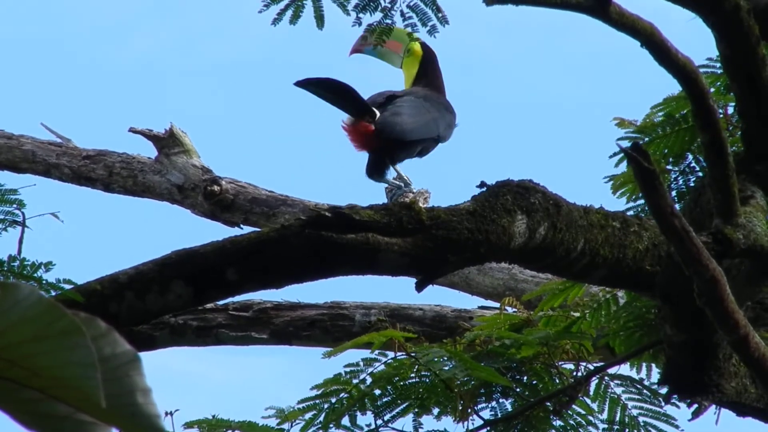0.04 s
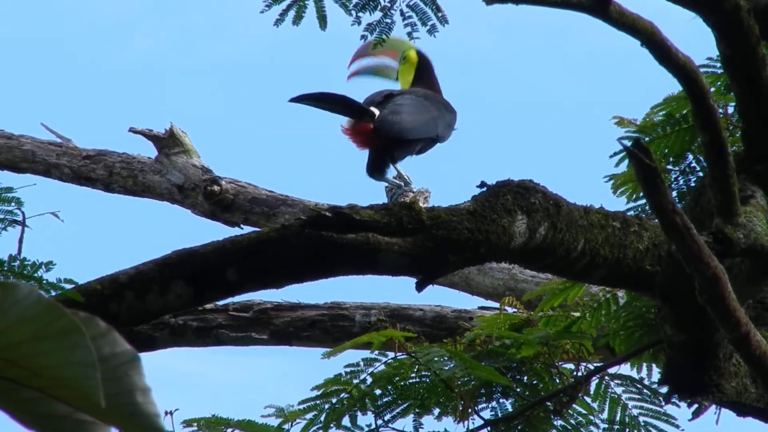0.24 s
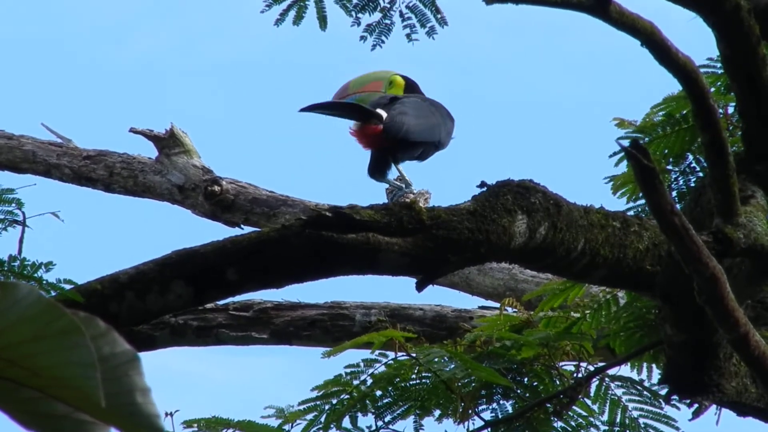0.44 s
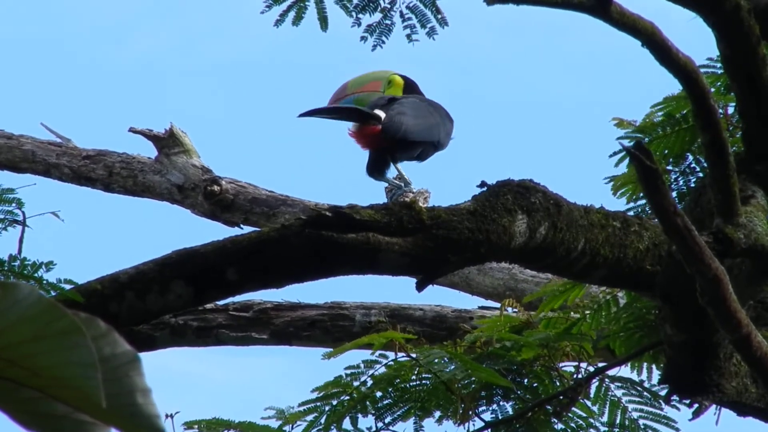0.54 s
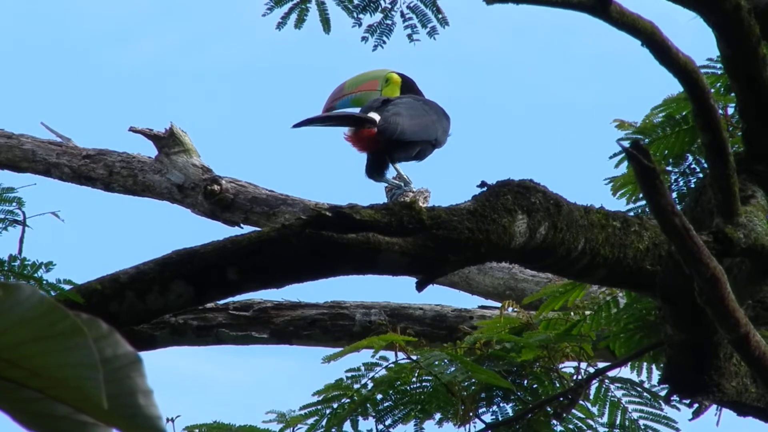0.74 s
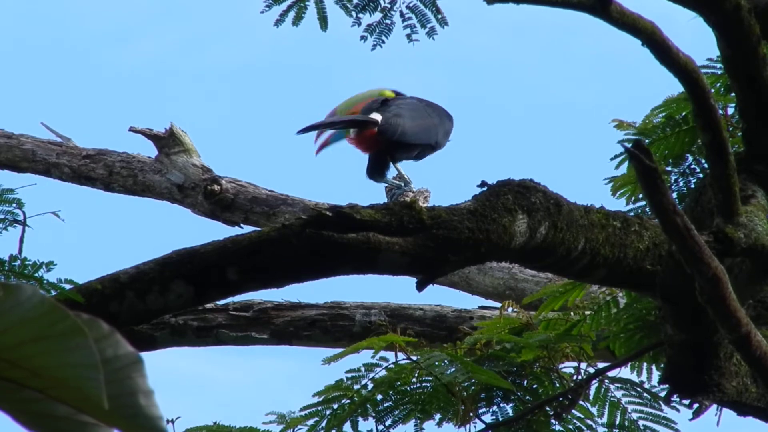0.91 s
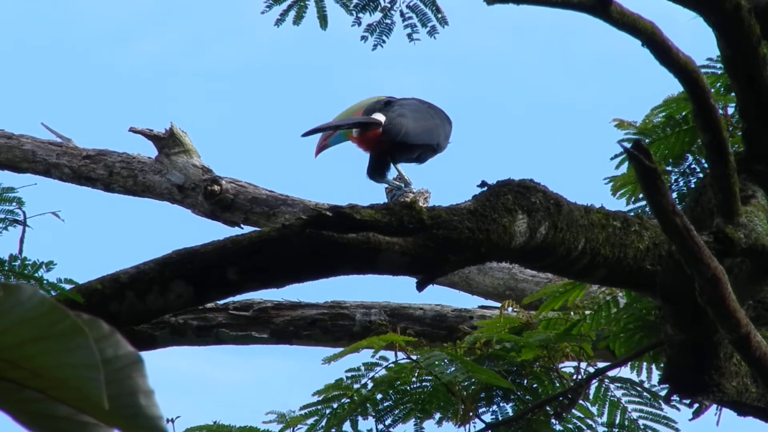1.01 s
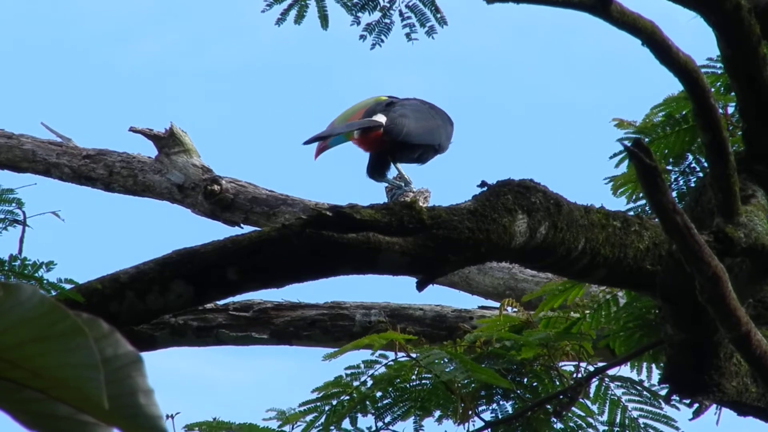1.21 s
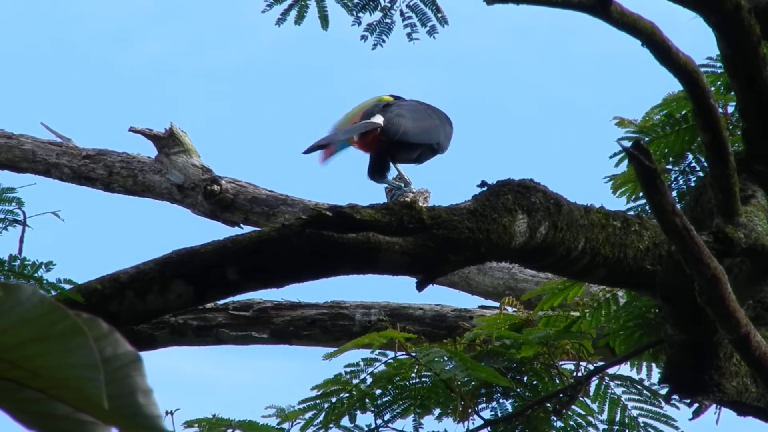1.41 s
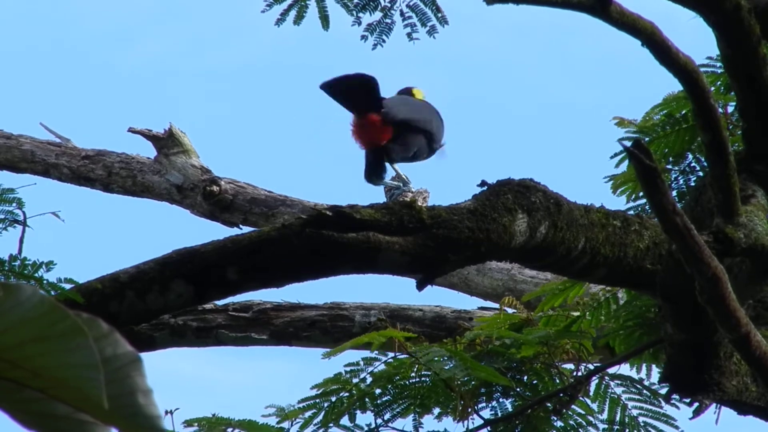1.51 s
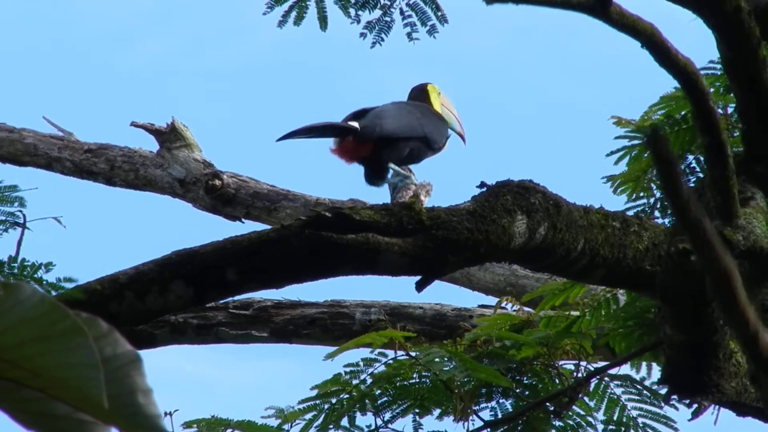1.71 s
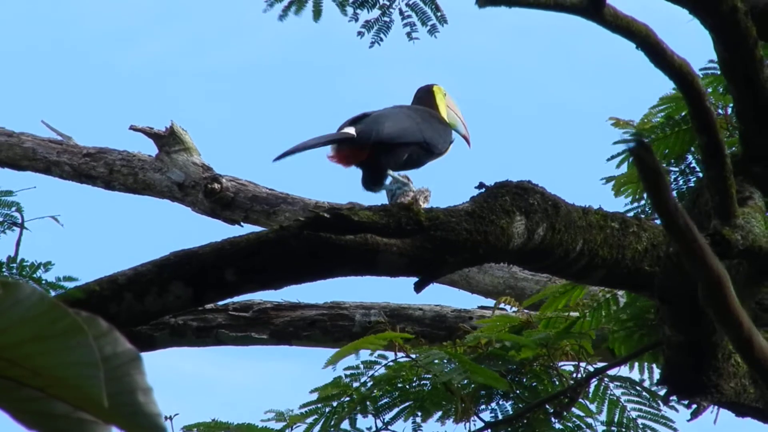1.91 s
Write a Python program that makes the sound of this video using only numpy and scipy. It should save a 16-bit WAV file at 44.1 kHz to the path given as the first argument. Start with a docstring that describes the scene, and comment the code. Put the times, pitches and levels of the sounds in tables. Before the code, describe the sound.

Outdoors in a forest, a toucan's clear yelps alternate with throbbing trills, slightly left of centre and with woodland echo, while rapid thin chipping builds at the left over faint whistles, insect hiss and a low wash.

```python
"""Toucan in a forest

A toucan gives three falling yelps and three softer, rising, throbbing trills, all gliding harmonic tones.
Discrete echoes return the yelps; random taps scatter all the calls.
A small bird's thin, mostly falling chips grow louder, among faint gliding whistles and the dying tail
of an earlier call. Shaped noise makes insect hiss, a low wash and a low rumble that swells now and then."""
import sys
import numpy as np
from scipy import signal
from scipy.fft import rfft, irfft
from scipy.io import wavfile
from scipy.ndimage import uniform_filter1d

SR = 44100
rng = np.random.default_rng(int(sys.argv[2]) if len(sys.argv) > 2 else 0)


def log_audio(samples):
    """Write samples as a 16-bit WAV file to the path given in sys.argv[1]."""
    # one column per channel
    frames = np.atleast_2d(samples).T
    # limit to full scale, then quantise
    limited = np.clip(frames, -1, 1)
    pcm = np.round(limited * 32767).astype(np.int16)
    wavfile.write(sys.argv[1], SR, pcm)


N = 85995  # length [samples]

# background spectrum: (frequency [Hz], relative density [dB])
AIR_SPECTRUM = [(15, -71), (25, -65), (64, 0.5), (126, -4), (179, -5.5), (222, -7), (333, -9.5), (414, -7),
                (513, -4), (691, -6.5), (749, -6.5), (1090, -9), (1640, -4), (2150, -8.5), (2460, -13),
                (2730, -9), (3220, -8.5), (9720, -13.5), (15800, -29.5)]
# left-right likeness of the background: (frequency [Hz], correlation [-1 to 1])
AIR_LIKENESS = [(60, 0.52), (150, 0.24), (400, -0.14), (1400, 0.28), (3000, 0.24), (5000, 0.36),
                (8000, -0.23), (15000, -0.31)]
# left-right balance of the background: (frequency [Hz], left minus right [dB])
AIR_BALANCE = [(60, 2.1), (120, 0.66), (240, -0.13), (480, -0.5), (950, -0.29), (1890, 1.9), (3770, 1.9),
               (7520, -1.3), (15000, -2.4)]
# low wash, then insect bands: (centre [Hz], half width [Hz], boost [dB])
AIR_BANDS = [(398, 64, 10), (3880, 86, 3), (5900, 160, 5), (9890, 660, 7)]
# low rumble swells: (centre [s], half length [s], centre [Hz], half width [octaves], boost [dB])
RUMBLE_SWELLS = [(0.324, 0.073, 107, 1, 11.5), (0.439, 0.048, 89, 0.93, 11.5),
                 (1.01, 0.076, 124, 0.49, 10.5), (1.61, 0.075, 92.59, 1, 7.5),
                 (1.27, 0.062, 453, 0.87, 1.5), (1.57, 0.46, 504, 1.0, 5.5)]
AIR_DB, PATCH_DB, FLICKER_DB = -52.5, 2, .5

# diffuse forest tail: (frequency [Hz], decay by 60 dB [s], level [dB])
FOREST_TAIL = [(477, 0.52, -6), (1540, 0.9, -16), (3050, 0.62, -11.5), (4720, 0.53, -14),
               (8100, 0.46, -2.5)]
FOREST_LIKENESS = 0.82  # left-right correlation of the taps
# scatter from nearby branches
NEAR_FIRST_S, NEAR_DECAY_S, NEAR_DB = .004, .022, -14

# faint whistles, and the dying tail of an earlier call:
# (start [s], length [s], start pitch [Hz], end pitch [Hz], level before sends [dB])
WHISTLES = [(-.08, 0.18, 2685, 2755, -50), (-.08, .22, 1703, 1639, -56), (0.264, 0.095, 2400, 2160, -54.5),
            (1.25, 0.099, 1760, 1875, -58.5), (1.427, 0.079, 1980, 1875, -55),
            (1.537, 0.079, 1920, 2084, -51), (1.61, 0.098, 3100, 3210, -58.5),
            (1.765, .08, 3228, 3365, -57), (1.841, .08, 3380, 3415, -56)]
# small bird: (start [s], start pitch [Hz], end pitch [Hz], level before sends [dB])
CHIPS = [ (0.560, 8200, 7320, -67), (0.617, 7000, 6050, -58.5), (0.723, 8200, 7180, -61),
         (0.778, 7100, 6140, -53), (0.878, 8250, 7170, -58.5), (0.932, 7200, 6120, -48),
         (1.001, 5750, 5050, -54), (1.031, 8300, 7200, -55.5), (1.078, 7500, 5930, -49),
         (1.106, 7400, 6300, -51), (1.153, 5900, 5300, -52.5), (1.181, 8300, 7130, -53.5),
         (1.227, 7600, 6250, -48.5), (1.253, 7400, 6280, -53), (1.299, 6300, 5230, -54.5),
         (1.332, 8400, 7200, -54.5), (1.378, 7500, 5700, -49), (1.405, 7400, 6200, -48),
         (1.45, 6600, 5280, -51.5), (1.483, 8400, 7220, -53.5), (1.534, 7800, 6270, -52),
         (1.558, 7600, 6360, -49.5), (1.605, 6500, 5350, -50.5), (1.638, 8300, 7370, -51.5),
         (1.683, 8100, 7050, -52.5), (1.707, 7900, 6100, -48.5), (1.759, 6600, 5380, -52),
         (1.788, 7700, 8030, -52.5), (1.847, 8200, 7100, -53.5), (1.866, 7900, 6480, -49),
         (1.912, 6550, 5490, -47), ]
# chip kinds, interpolated between: (start pitch [Hz], length [s], direct gain [dB])
CHIP_KINDS = [(6600, .022, -4), (7370, 0.01237, -12.5), (8250, 0.0157, -0.5)]
CHIP_ROUGH, WHISTLE_ROUGH = 0.16, .35
CHIP_FOREST_DB, CHIP_NEAR_DB = 9, 8
WHISTLE_DIRECT_DB, WHISTLE_FOREST_DB = -5, 8
CHIP_PAN_DB, SCATTER_PAN_DB = 12, 7.5

# one list per yelp: (time [s], pitch [Hz], fundamental [dB], octave [dB], upper overtones [dB],
# roughness [0 to 1])
YELPS = [
    [(0.218, 1656, -33.5, -33, -52, .01), (0.233, 1707, -31.5, -29, -60, 0),
     (0.249, 1682, -25, -26.5, -48, 0), (0.267, 1579, -24.5, -28, -50, 0),
     (0.300, 1518, -37, -43, -53, .15), (0.325, 1488, -30, -33.5, -50, 0.12),
     (0.346, 1429, -27.5, -35.5, -56, 0), (0.355, 1367, -41, -42.5, -57, 0.1),
     (0.369, 1226, -46, -43, -53, 0.37)],
    [(0.508, 1449, -34, -29.5, -71, 0.01), (0.517, 1496, -39.5, -39, -47, 0),
     (0.524, 1500, -34.5, -30.5, -65, 0.04), (0.531, 1461, -31.5, -29, -50, 0),
     (0.536, 1383, -47, -37, -45.5, 0.4), (0.547, 1310, -36.5, -34.5, -52, 0.25)],
    [(0.820, 1512, -35, -39, -44, .05), (0.831, 1539, -44, -34.5, -56, 0.09),
     (0.841, 1508, -44.5, -33.5, -54, 0.07), (0.848, 1464, -31.5, -34, -47, 0),
     (0.852, 1360, -45, -36, -44, 0.47), (0.860, 1340, -45, -35, -54, 0.5)],
]
# upper overtones: (multiple of the pitch, level against the upper overtones column [dB])
YELP_OVERTONES = [(3, -2), (4, -13), (5, -24)]
# one list per trill: (time [s], pitch [Hz], level [dB], throb depth, double-speed throb depth)
TRILLS = [
    [(0.372, 1332, -38, 0.64, 0.3), (0.405, 1407, -42, 0.46, .7), (0.430, 1527, -32.5, 0.036, 0.64),
     (0.465, 1512, -33, .03, 0.63), (0.482, 1610, -35, 0.035, .3)],
    [(0.902, 1311, -45, 1, .03), (0.932, 1333, -39, 0.85, .03), (0.975, 1390, -39.5, 1.15, 0.027),
     (1.015, 1492, -34.5, 0.98, 0.16), (1.036, 1535, -32.5, .05, 0.3), (1.068, 1559, -31.5, .03, 0.65),
     (1.082, 1588, -39, .03, .2)],
    [(1.506, 1323, -49, 0.8, .03), (1.532, 1337, -39, 1.44, .03), (1.574, 1445, -38.5, 0.5, 0.028),
     (1.594, 1510, -33.5, 0.89, 0.068), (1.618, 1567, -32, 0.94, 0.12), (1.634, 1576, -31, 0.12, 0.037),
     (1.680, 1588, -32, 0.18, 0.036), (1.699, 1636, -38, .03, 0.028)],
]
# one row per trill: (time of one throb [s], rate [throbs/s], octave [dB], third harmonic [dB]),
# both harmonics against the fundamental
TRILL_THROBS = [(0.441, 50, -38, -17), (0.973, 47.75, -24, -50), (1.573, 48.8, -24.5, -40)]
# discrete echoes off trunks and crowns: (delay [s], left [dB], right [dB])
ECHOES = [(0.028, -14.5, -14.5), (0.044, -14.5, -24), (0.058, -36, -21), (0.081, -18.5, -39)]
ATTACK_S, RELEASE_S = 0.0081, 0.0073
RASP_HZ, JITTER = 352, 0.093  # roughness bandwidth; relative pitch jitter per unit roughness
THROB_BEND, TRILL_WAVER = .015, .016  # pitch swing within a throb: per unit depth, and constant
THROB_ROUGH, TRILL_ROUGH = .15, .05  # roughness: per unit depth, and constant
# second trill tone: share, twice the throb depth at which it enters, offset in throb rates
SPLIT_SHARE, SPLIT_FROM, SPLIT_MULTIPLE = .6, 1.4, 4
TOUCAN_PAN_DB, TRILL_PAN_DB, LEFT_LAG_S = 2.0, 3.2, .00002
TRILL_NEAR_DB, TRILL_FAR_DB = -3, -2  # trill sends against the yelps
FOREST_DELAY_S = .036

BASS_CUT_HZ, EDGE_HZ = 65, 15800


def amp(db):
    """Decibels to gain."""
    return 10 ** (np.asarray(db) / 20)


def evened(x):
    """Scales to an rms of one."""
    return x / np.sqrt(np.mean(x ** 2) + 1e-20)


def read(points, hz):
    """Interpolates a table on a log-frequency axis."""
    f, value = np.transpose(points)
    return np.interp(np.log(hz + 1), np.log(f + 1), value)


def follow(curve):
    """Sample times of a call, then each of its controls at those times."""
    s, *columns = np.transpose(curve)
    t = np.arange(s[0], s[-1], 1 / SR)
    return [t] + [np.interp(t, s, c) for c in columns]


def wander(size, hz):
    """Low-passed noise of unit rms."""
    low_pass = signal.butter(6, hz, fs=SR, output="sos")
    settled = signal.sosfilt(low_pass, rng.standard_normal(N))[-size:]
    return evened(settled)


def track(events):
    """Sums (start, sound) pairs on one time line; a sound may already be under way at time zero."""
    out = np.zeros(N)
    for start_s, sound in events:
        at = round(start_s * SR)
        sound = sound[max(-at, 0):]
        part = out[max(at, 0):][:len(sound)]
        part += sound[:len(part)]
    return out


def pan(x, db):
    """Leans a sound to the left by a level difference."""
    return x * amp([[db / 2], [-db / 2]])


def delayed(x, delay_s):
    """Fractional delay as a phase slope."""
    hz = np.fft.rfftfreq(2 * N, 1 / SR)
    return irfft(rfft(x, 2 * N) * np.exp(-2j * np.pi * hz * delay_s))[..., :N]


def background():
    """Wide insect hiss, low wash and rumble swells: noise shaped in frequency, time and stereo width."""
    frames, hz = N // 256 + 5, np.fft.rfftfreq(1024, 1 / SR)
    t = np.arange(frames)[:, None] * 256 / SR
    a, b, c, d, patches = rng.standard_normal((5, frames, len(hz)))
    patches = uniform_filter1d(patches, size=12, axis=0)
    patches = evened(uniform_filter1d(patches, size=10, axis=1))

    db = read(AIR_SPECTRUM, hz)
    db = db + sum(g * np.exp(-((hz - f) / w) ** 2) for f, w, g in AIR_BANDS)
    db = db + PATCH_DB * patches + FLICKER_DB * rng.standard_normal((frames, 1))
    swell_db = 0
    for s, half_s, f, octaves, g in RUMBLE_SWELLS:
        distance = ((t - s) / half_s) ** 2 + (np.log2((hz + 1) / f) / octaves) ** 2
        swell_db = swell_db + g * np.exp(-distance)

    same = np.clip(read(AIR_LIKENESS, hz), -1, 1)
    lean = amp(read(AIR_BALANCE, hz) / 2)
    left, other = a + 1j * b, c + 1j * d
    right = same * left + np.sqrt(1 - same ** 2) * other
    z = np.array([left * lean, right / lean]) * amp(db)

    def sound(spectrum):
        return signal.istft(spectrum, nperseg=1024, noverlap=768, time_axis=1, freq_axis=2)[1][:, :N]

    # level reference: the mono sum without swells
    return amp(AIR_DB) * sound(z * amp(swell_db)) / sound(z).mean(0).std()


def forest(x):
    """Scatter from leaves and branches: sparse random taps that die at a different rate in each band."""
    a, b = rng.standard_normal((2, SR)) * (rng.random(SR) < .1)
    taps = np.array([a, FOREST_LIKENESS * a + np.sqrt(1 - FOREST_LIKENESS ** 2) * b])
    hz, t, z = signal.stft(taps, SR, nperseg=256)
    table = np.array(FOREST_TAIL)
    t60_s, level_db = read(table[:, :2], hz), read(table[:, ::2], hz)
    z = z * amp(-60 * t / t60_s[:, None])
    energy = (abs(z) ** 2).sum(2).mean(0)
    z /= np.sqrt(uniform_filter1d(energy, size=3))[:, None]
    flat = signal.istft(z, SR, nperseg=256)[1]
    tail = signal.istft(z * amp(level_db)[:, None], SR, nperseg=256)[1]
    tail = tail / np.linalg.norm(flat[0])
    return signal.fftconvolve(x[None], tail, axes=1)[:, :N]


def branches(x):
    """Weak early reflections from branches around a bird: decaying random taps, partly shared by the sides."""
    t = np.arange(0, NEAR_FIRST_S + 4 * NEAR_DECAY_S, 1 / SR)
    taps = rng.standard_normal((3, len(t))) * (t > NEAR_FIRST_S) * np.exp(-t / NEAR_DECAY_S)
    taps = taps[:2] + taps[2]
    taps = taps / np.linalg.norm(taps[0])
    return amp(NEAR_DB) * signal.fftconvolve(x[None], taps, axes=1)[:, :N]


def glide(start_s, length_s, from_hz, to_hz, db, rough):
    """One note: a roughened sine whose pitch glides fastest at first."""
    u = np.arange(0, length_s, 1 / SR) / length_s
    hz = from_hz + (to_hz - from_hz) * np.sin(np.pi / 2 * u ** 1.083)
    phase = 2 * np.pi * np.cumsum(hz) / SR
    envelope = np.sqrt(2 * np.sin(np.pi * u)) * (1 + rough * wander(len(u), RASP_HZ))
    return start_s, amp(db) * envelope * np.sin(phase)


def chips_and_whistles():
    """Chips, faint whistles and the tail of an earlier call, direct and scattered by the trees."""
    kinds = np.array(CHIP_KINDS)
    chips, direct = [], []
    for s, from_hz, to_hz, db in CHIPS:
        length_s, direct_db = read(kinds[:, :2], from_hz), read(kinds[:, ::2], from_hz)
        start_s, sound = glide(s, length_s, from_hz, to_hz, db, CHIP_ROUGH)
        chips.append((start_s, sound))
        direct.append((start_s, sound * amp(direct_db)))
    chips, direct = track(chips), track(direct)
    whistles = track(glide(*row, WHISTLE_ROUGH) for row in WHISTLES)
    scatter = forest(chips * amp(CHIP_FOREST_DB) + whistles * amp(WHISTLE_FOREST_DB))
    scatter = scatter + branches(chips * amp(CHIP_NEAR_DB))
    return pan(direct, CHIP_PAN_DB) + whistles * amp(WHISTLE_DIRECT_DB) + pan(scatter, SCATTER_PAN_DB)


def edges(t):
    """Attack and release of a toucan call."""
    ramp = np.minimum((t - t[0]) / ATTACK_S, (t[-1] - t) / RELEASE_S)
    return np.sin(np.pi / 2 * np.clip(ramp, 0, 1))


def yelp(curve):
    """A falling harmonic tone with a strong octave; jitter in pitch and level makes the rasp."""
    t, hz, first_db, octave_db, upper_db, rough = follow(curve)
    jitter = JITTER * rough * wander(len(t), RASP_HZ)
    phase = 2 * np.pi * np.cumsum(hz * (1 + jitter)) / SR
    tone = amp(first_db) * np.sin(phase) + amp(octave_db) * np.cos(2 * phase)
    tone += sum(amp(upper_db + db) * np.sin(k * phase) for k, db in YELP_OVERTONES)
    rasp = np.maximum(1 + rough * wander(len(t), RASP_HZ), 0)
    return t[0], edges(t) * tone * rasp * np.sqrt(2)


def trill(curve, beat_s, rate_hz, octave_db, third_db):
    """A rising tone gated into throbs; a second, higher tone splits each deep throb in two."""
    t, hz, db, slow, fast = follow(curve)
    beat = 2 * np.pi * rate_hz * (t - beat_s)
    gate = np.exp(slow * (np.cos(beat) - 1) + fast * (np.cos(2 * beat) - 1))
    rough = TRILL_ROUGH + THROB_ROUGH * slow
    bend = (TRILL_WAVER + THROB_BEND * slow) * np.sin(beat)
    jitter = JITTER * rough * wander(len(t), RASP_HZ)
    phase = 2 * np.pi * np.cumsum(hz * (1 + bend + jitter)) / SR
    tone = np.sin(phase) + amp(octave_db) * np.sin(2 * phase) + amp(third_db) * np.sin(3 * phase)
    split = SPLIT_SHARE * np.clip(2 * slow - SPLIT_FROM, 0, 1)
    tone -= split * np.sin(phase + SPLIT_MULTIPLE * beat)
    rasp = 1 + rough * wander(len(t), RASP_HZ)
    return t[0], edges(t) * amp(db) * gate * tone * rasp * np.sqrt(2)


def toucan():
    """Yelps and trills, a little to the left; only the loud yelps return as discrete echoes."""
    yelps = track(yelp(curve) for curve in YELPS)
    trills = track(trill(curve, *row) for curve, row in zip(TRILLS, TRILL_THROBS))
    left, right = pan(yelps, TOUCAN_PAN_DB) + pan(trills, TRILL_PAN_DB)
    direct = np.array([delayed(left, LEFT_LAG_S), right])
    echoes = sum(amp([[l], [r]]) * delayed(yelps, s) for s, l, r in ECHOES)
    near = branches(yelps + amp(TRILL_NEAR_DB) * trills)
    far = forest(delayed(yelps + amp(TRILL_FAR_DB) * trills, FOREST_DELAY_S))
    return direct + echoes + near + far


def scene():
    """The background, the chips and whistles, and the toucan."""
    return background() + chips_and_whistles() + toucan()


def record(dry):
    """The microphone's bass cut, then the band limit."""
    bass_cut = signal.butter(4, BASS_CUT_HZ, "high", fs=SR, output="sos")
    thin = signal.sosfilt(bass_cut, dry)
    band_limit = signal.firwin(511, EDGE_HZ, window=("kaiser", 9), fs=SR)
    return signal.oaconvolve(thin, band_limit[None], "same")


dry = scene()
out = record(dry)
log_audio(out)
```